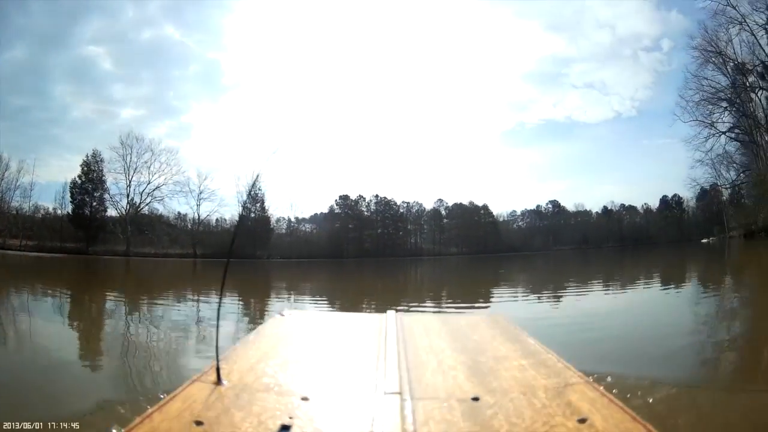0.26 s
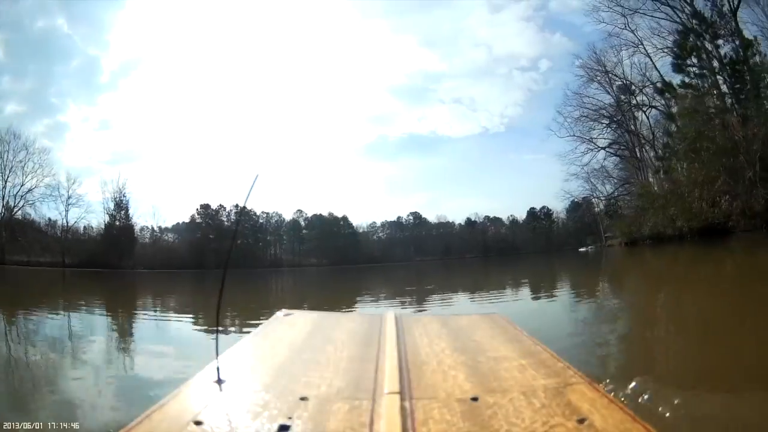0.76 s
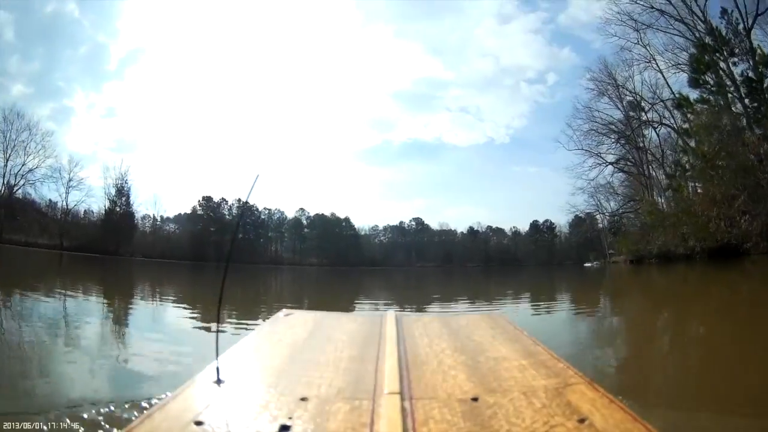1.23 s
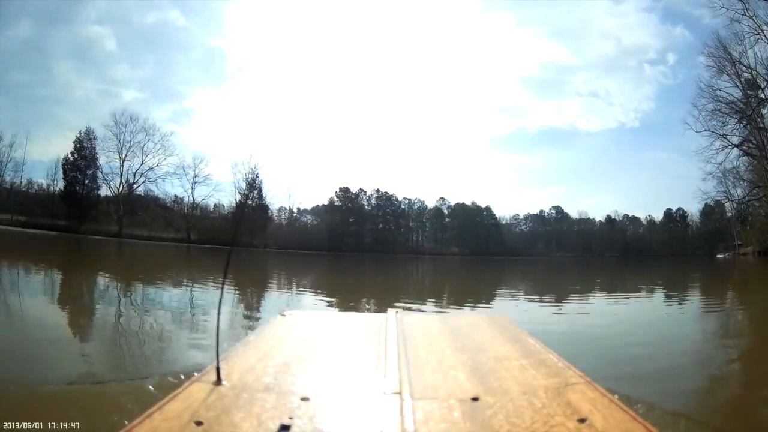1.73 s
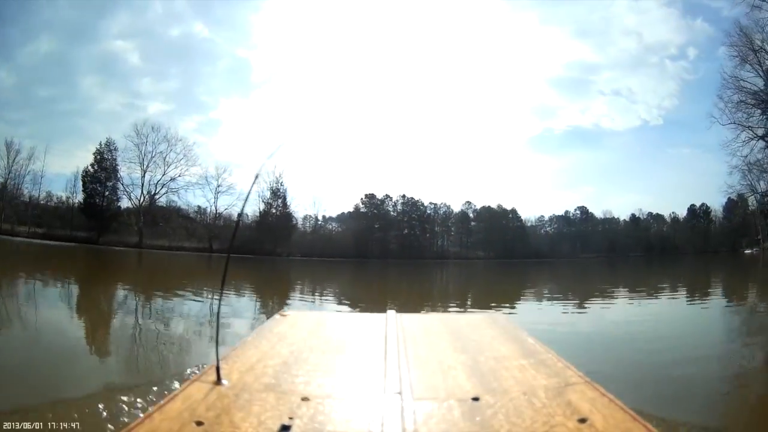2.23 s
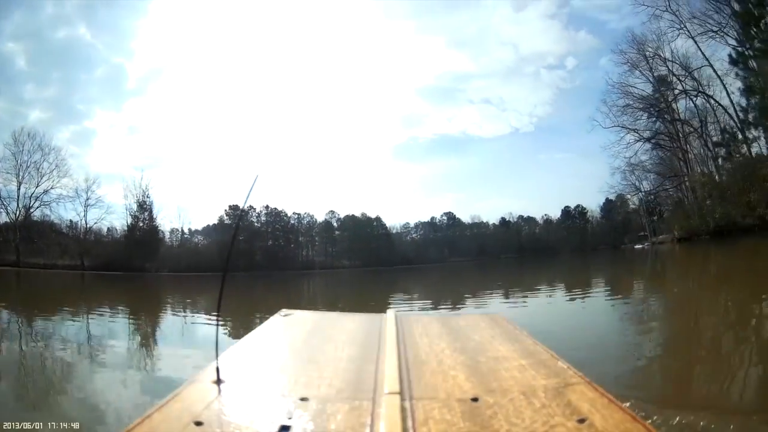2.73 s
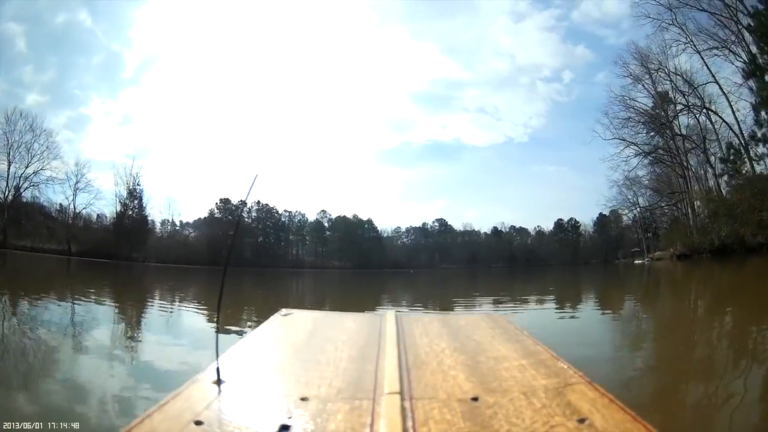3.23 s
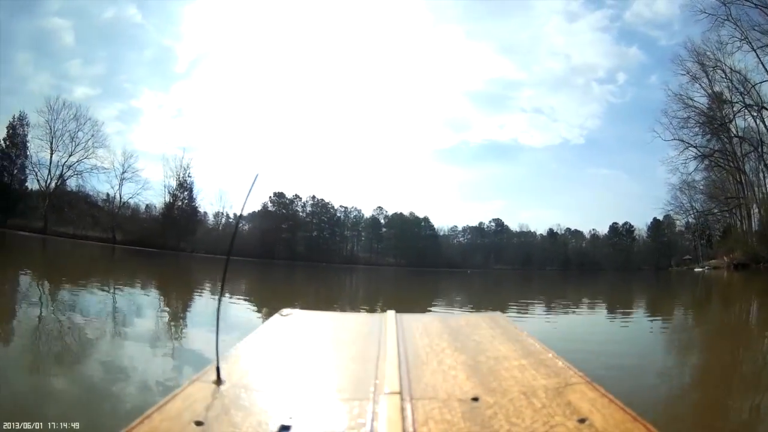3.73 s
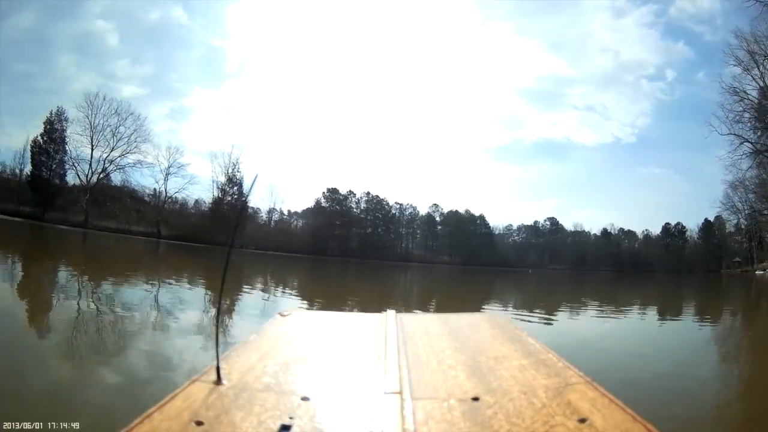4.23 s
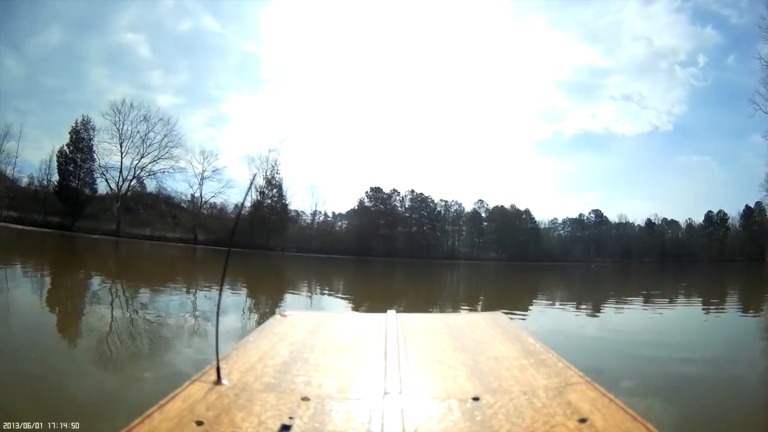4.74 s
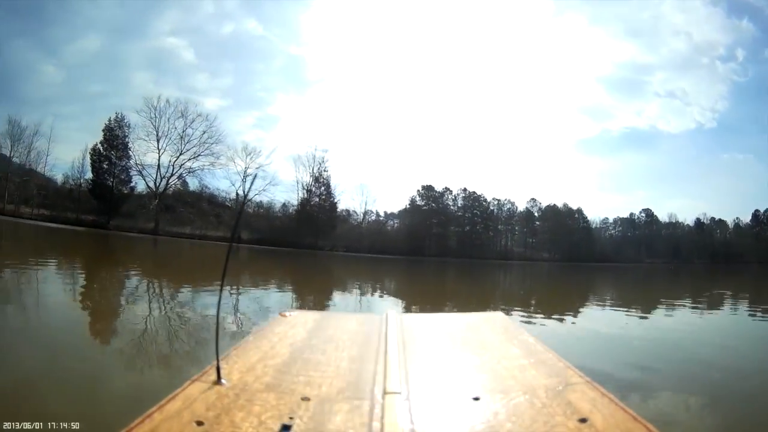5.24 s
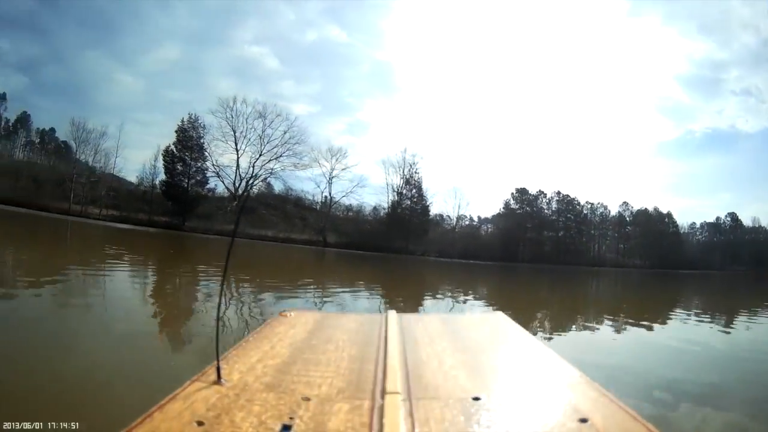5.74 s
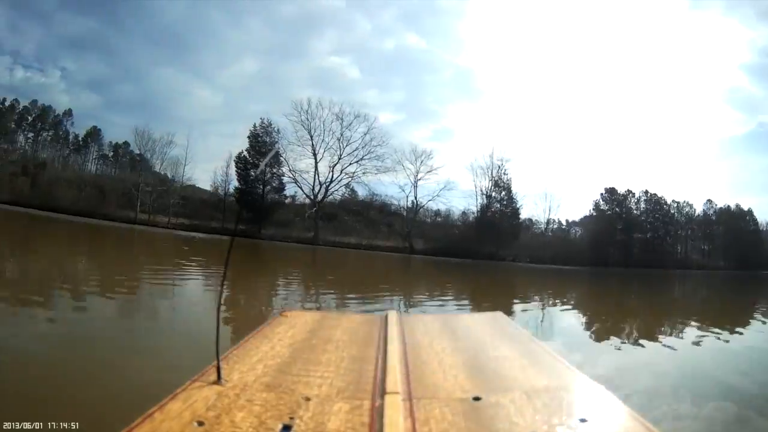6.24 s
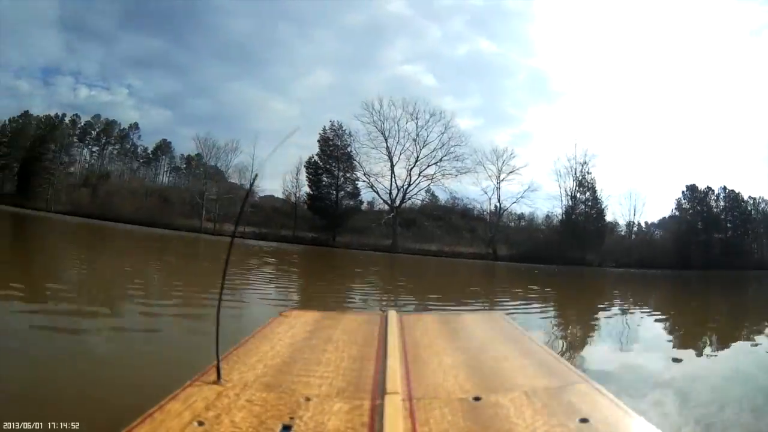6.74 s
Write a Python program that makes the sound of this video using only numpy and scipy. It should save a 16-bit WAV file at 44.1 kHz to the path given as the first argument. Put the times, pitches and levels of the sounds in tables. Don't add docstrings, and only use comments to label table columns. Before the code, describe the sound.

A small electric motor and propeller whine loudly up close, briefly cut out and dip, then climb in steps to a shrill, steady, overloaded scream.

```python
import sys
import numpy as np
from scipy import signal
from scipy.fft import rfft, irfft, next_fast_len
from scipy.io import wavfile

SR = 44100
rng = np.random.default_rng(int(sys.argv[2]) if len(sys.argv) > 2 else 0)


def to_wav(sig):
    pcm = np.clip(np.atleast_2d(sig), -1, 1) * 32767
    pcm = np.round(pcm).astype(np.int16)
    wavfile.write(sys.argv[1], SR, pcm.T)


def ratio(d):
    e = np.asarray(d, float) / 20
    return 10 ** e


N = 308259

# start in seconds, speed the setting would settle at in turns per second.
STICK = [(0.0, 90.41), (0.083, 99.63), (0.334, 111.07), (0.504, 114.29), (0.714, 94.87), (0.8, 0.0),
         (1.082, 78.34), (1.11, 93.07), (1.19, 87.67), (1.384, 109.49), (1.635, 106.83), (1.938, 123.57),
         (1.949, 107.7), (2.368, 111.43), (2.501, 112.9), (3.52, 114.78), (3.593, 123.14), (3.867, 125.51),
         (4.043, 133.98), (4.158, 138.84), (4.292, 136.4), (6.424, 133.87), (6.579, 134.76)]
# time in seconds, share of full current from 0 to 1.
THROTTLE = [
    (0, 1),
    (.829, 1),
    (.834, .45),
    (.846, .4),
    (.85, 0),
    (1.087, 0),
    (1.094, .7),
    (1.125, 1),
    (7, 1),
]
ROTOR_ORDERS = [1, 3, 6, 8, 10, 11, 12, 18, 24, 26, 31, 28, 36, 38, 56, 84]
ROTOR_DB = [-58.5, -38.5, -48, -55, -56.5, -69, -51, -65.5, -69.5, -61, -58, -61, -71, -57, -59, -59]
# frequency in Hz, level in dB.
MOUNT_13 = [(730, -72), (900, -63), (1060, -57.5), (1150, -69), (1230, -54), (1380, -56), (1600, -45.5),
            (1780, -41.5)]
# frequency in Hz, level in dB.
MOUNT_14 = [(780, -66), (1020, -59), (1250, -57), (1480, -52), (1560, -47), (1730, -48), (1860, -37),
            (1910, -39.5)]
# frequency in Hz, level in dB.
BELL = [(2350, -56), (2750, -58), (3500, -59), (4400, -48), (4700, -39), (4970, -32), (5200, -29),
        (5730, -35)]
# frequency in Hz, level in dB.
DECK = [(110, -10), (285, -46), (335, -21), (560, -27), (870, -14.5), (1050, -3), (1160, -11), (1550, -4.5),
        (1760, -10.5), (2030, 0.5), (2220, -12), (3600, -21), (5300, -8.5), (6800, -28)]
# multiple of chopping rate, shaft order in cycles per turn, dB against chopping tone.
WINDING = [(1, -21, 3), (1, 21, -6), (1, -28, -13), (1, -19, -15.5), (1, -42, -6.5), (1, 42, 1), (1, 1, 2),
           (1, -1, -10), (-1, 126, -5), (-1, 147, -15), (-1, 168, -29), (2, -105, -13), (2, -126, -11),
           (-2, 210, -21), (-2, 252, -12), (0, 21, 1), (0, 77, -11), (0, 63, -9.5), (0, 84, 3.5),
           (0, 126, -13)]
# frequency in Hz, level in dB.
CASE = [(200, -65), (1500, -17), (3000, -17.5), (4100, -18), (4800, -6), (5300, 1.5), (5700, -7),
        (6200, -21.5), (7200, -15), (8300, -20.5), (9300, -25.5), (10800, -29.5), (12500, -19),
        (15000, -62)]
# frequency in Hz, density in dB per Hz.
RUSH = [(30, -16), (80, -12), (300, -19), (700, -19), (1400, -16), (3000, -18.5), (4000, -37), (6000, -31),
        (9000, -38), (14500, -73)]

STICK_MOVE_S, START_TURNS_PER_S = .063, 88.1
DRAG_PER_TURN, FRICTION_TURNS_PER_S2 = .0301, 9.9
SAG_FROM_S, SAG_PER_S = 5.22, .0047
CHOP_REST_HZ, CHOP_SAG_HZ_PER_TURN_PER_S = 7805, .886
CHOP_DB = -43
FREEWHEEL_DB, EASING_DB_PER_DECADE = -18, 38
BLADE_DB, BLADE_DB_PER_DECADE = -45.5, 42
SLAP_DB, SLAP_DB_PER_DECADE, RIPPLE_PATCH_DB = -72.5, 57, 3
CLIP_TOP = 0.016


def in_time(rows):
    s, *columns = np.transpose(rows)
    return [np.interp(np.arange(N) / SR, s, column) for column in columns]


def at_hz(points, hz):
    point_hz, point_db = np.transpose(points)
    return np.interp(np.log(np.abs(hz) + 1), np.log(point_hz), point_db)


def rms_one(x):
    return x / np.sqrt(np.mean(x ** 2) + 1e-20)


def drift(rate_hz):
    pole = np.exp(-80 * np.pi * rate_hz / SR)
    white = rng.standard_normal(N // 40 + 2002)
    slow = signal.lfilter([1], [1, -2 * pole, pole * pole], white)[2000:]
    return np.interp(np.arange(N) / 40, np.arange(len(slow)), rms_one(slow))


def tone(phase, db, waver_db, locked=False):
    level = ratio(db + waver_db * drift(8.4))
    start = rng.uniform(0, 2 * np.pi) * (not locked)
    return np.sqrt(2) * level * np.sin(phase + start)


def coloured(x, spectrum):
    size = next_fast_len(N)
    gain = ratio(at_hz(spectrum, np.fft.rfftfreq(size, 1 / SR)))
    return irfft(rfft(x, size) * gain, size)[:N]


def every_turn(turn, orders, spread_db):
    angle = np.arange(4097) * 2 * np.pi / 4096
    wave = 0
    for order in orders:
        strength = ratio(rng.normal(0, spread_db))
        wave = wave + strength * np.sin(order * angle + rng.uniform(0, 2 * np.pi))
    return rms_one(np.interp(turn % (2 * np.pi), angle, wave))


def shaft_speed(rate_hz=400):
    t = np.arange(N * rate_hz // SR + 2) / rate_hz
    start_s, settle = np.transpose(STICK)
    moved = np.clip((t - start_s[1:, None]) / STICK_MOVE_S, 0, 1)
    torque = settle[0] ** 2 + np.diff(settle ** 2) @ moved
    torque = torque * (1 - SAG_PER_S * np.maximum(t - SAG_FROM_S, 0)) ** 2
    speed = [START_TURNS_PER_S]
    for push in torque[:-1]:
        gain = DRAG_PER_TURN * (push - speed[-1] ** 2)
        loss = FRICTION_TURNS_PER_S2 * (push < 1)
        speed.append(speed[-1] + (gain - loss) / rate_hz)
    return in_time(np.transpose([t, speed, torque / np.square(speed)]))


def rotor(speed, turn, blade_db):
    db13, db14 = at_hz(MOUNT_13, 13 * speed), at_hz(MOUNT_14, 14 * speed)
    out = tone(2 * turn, blade_db, waver_db=0.0)
    out += tone(4 * turn, blade_db - 13.0, waver_db=1.5)
    out += tone(14 * turn, db14, waver_db=.8, locked=True)
    out -= tone(13 * turn, db13, waver_db=.8, locked=True)
    for order, db in [(15, -8.0), (16, -4.0)]:
        out += tone(order * turn, db14 + db + at_hz(DECK, order * speed), waver_db=1.8, locked=True)
    for order, db in zip(ROTOR_ORDERS, ROTOR_DB):
        out += tone(order * turn, db + at_hz(DECK, order * speed), waver_db=3.5)
    return out


def unbalance(turn, blade_db, shake_db=-18.5):
    shake = every_turn(turn, range(5, 50), spread_db=5)
    return ratio(blade_db + shake_db) * rms_one(coloured(shake, DECK))


def switching_web(turn, chop, fine_db=3.5, double_db=-5.0):
    steps = every_turn(turn, range(63, 130, 21), spread_db=6.0)
    steps += ratio(fine_db) * every_turn(turn, range(1, 100), spread_db=7.5)
    carrier = np.cos(chop) + ratio(double_db) * np.cos(2 * chop)
    return rms_one(coloured(steps * carrier, CASE))


def windings(speed, turn, load, web_db=-9.5, hiss_db=-15):
    chop_hz = CHOP_REST_HZ - CHOP_SAG_HZ_PER_TURN_PER_S * speed
    chop = 2 * np.pi * np.cumsum(chop_hz) / SR
    powered = tone(chop, CHOP_DB, waver_db=0.63)
    for times, order, db in WINDING:
        colour_db = at_hz(CASE, times * chop_hz + order * speed)
        powered += tone(times * chop + order * turn, CHOP_DB + db + colour_db, waver_db=0.36)
    powered += ratio(CHOP_DB + web_db + 26 * np.log10(speed / 100)) * switching_web(turn, chop)
    hiss = rms_one(coloured(rng.standard_normal(N), CASE))
    powered += ratio(CHOP_DB + hiss_db + drift(8)) * hiss
    wobble = 0.13 * np.sin(turn) + 0.097 * np.sin(2 * turn)
    easing_db = EASING_DB_PER_DECADE * np.log10(np.clip(load, 1e-9, 1))
    step_db = at_hz(BELL, 42 * speed) + np.maximum(FREEWHEEL_DB, easing_db)
    steps = tone(42 * turn + wobble, step_db, waver_db=.5)
    return powered * in_time(THROTTLE)[0] + steps


def slipstream(speed, turn, rush_db=-57.5, ring_db=-67.0, db_per_decade=29.0, throb=0.82):
    white = rng.standard_normal((2, N)) * (1 + throb * np.cos(2 * turn))
    air = ratio(rush_db) * rms_one(coloured(white[0], RUSH))
    ring = ratio(ring_db) * rms_one(coloured(white[1], DECK))
    return ratio(db_per_decade * np.log10(speed / 100) + 0.57 * drift(9.4)) * (air + ring)


def water(speed, low_hz=30, high_hz=105):
    slap_db = SLAP_DB + SLAP_DB_PER_DECADE * np.log10(speed / 100) + RIPPLE_PATCH_DB * drift(1.6)
    band = signal.butter(2, [low_hz, high_hz], "band", fs=SR, output="sos")
    rumble = rms_one(signal.sosfilt(band, rng.standard_normal(N)))
    return ratio(slap_db + 0.55 * drift(5.8)) * rumble


def scene():
    speed, load = shaft_speed()
    turn = 2 * np.pi * np.cumsum(speed) / SR + 0.0025 * drift(4.3)
    blade_db = BLADE_DB + BLADE_DB_PER_DECADE * np.log10(speed / 100)
    mix = rotor(speed, turn, blade_db) + unbalance(turn, blade_db)
    mix += windings(speed, turn, load)
    mix += slipstream(speed, turn) + water(speed)
    return mix[None]


def roll_off(x):
    return signal.sosfilt(signal.butter(12, 14750, fs=SR, output="sos"), x)


def record(dry):
    fine = signal.resample_poly(dry, 2, 1, axis=1) / CLIP_TOP
    knee = 2.95
    flat = CLIP_TOP * fine / (1 + np.abs(fine) ** knee) ** (1 / knee)
    top_cut = signal.cheby2(16, 70, 14850, fs=SR, output="sos")
    mix = signal.sosfilt(top_cut, signal.resample_poly(flat, 1, 2, axis=1))
    return roll_off(mix)


dry = scene()
out = record(dry)
to_wav(out)
```